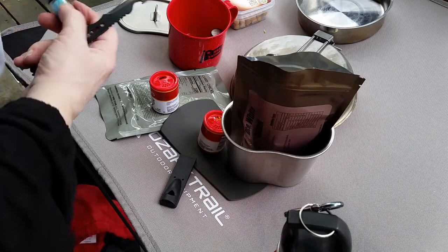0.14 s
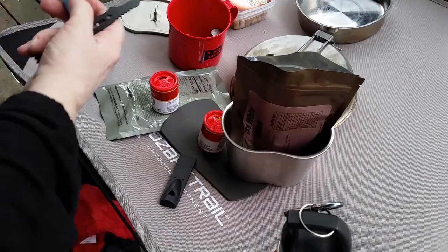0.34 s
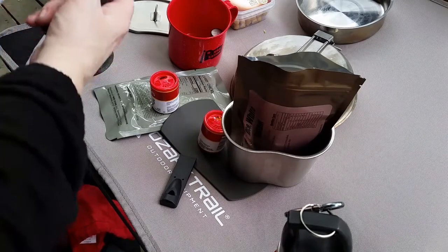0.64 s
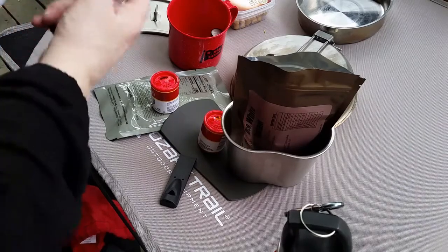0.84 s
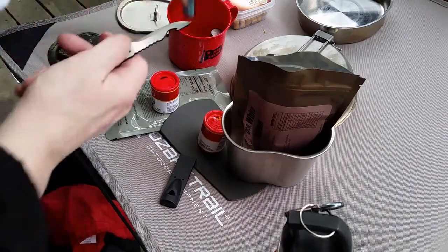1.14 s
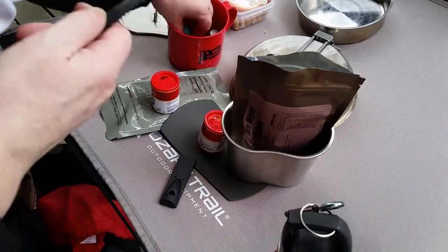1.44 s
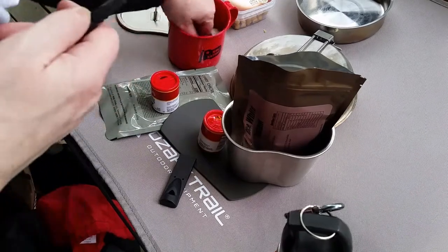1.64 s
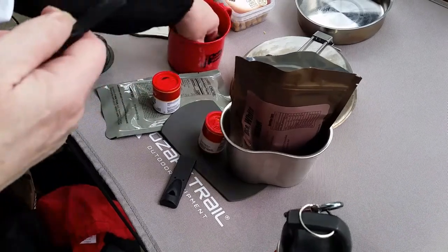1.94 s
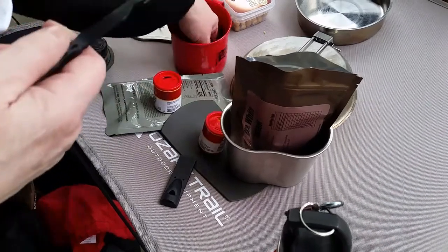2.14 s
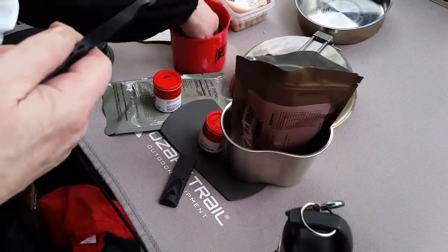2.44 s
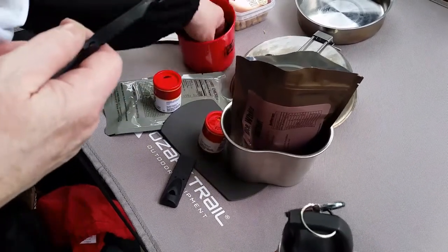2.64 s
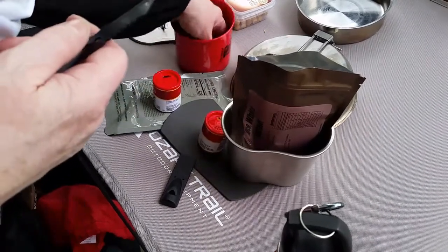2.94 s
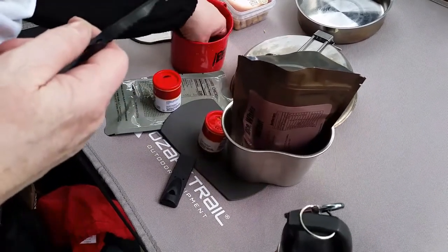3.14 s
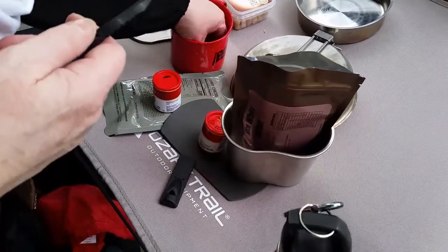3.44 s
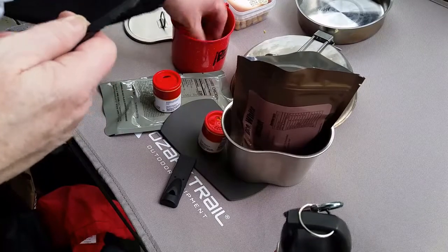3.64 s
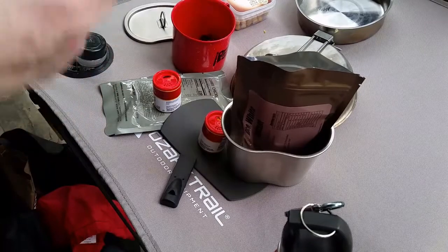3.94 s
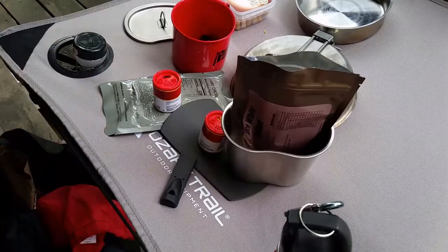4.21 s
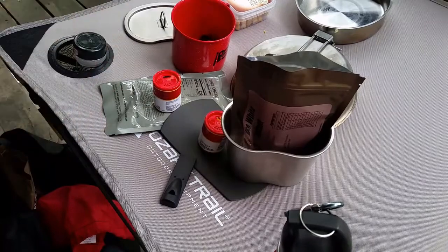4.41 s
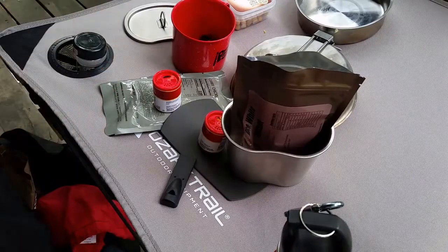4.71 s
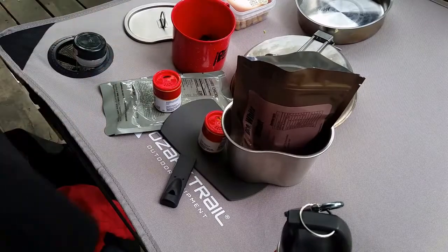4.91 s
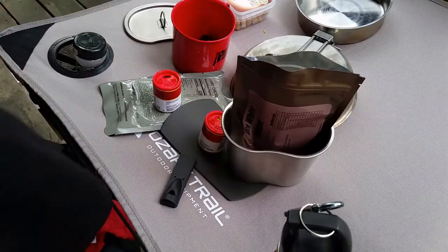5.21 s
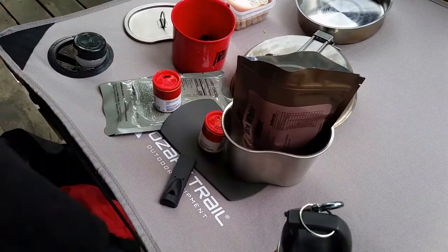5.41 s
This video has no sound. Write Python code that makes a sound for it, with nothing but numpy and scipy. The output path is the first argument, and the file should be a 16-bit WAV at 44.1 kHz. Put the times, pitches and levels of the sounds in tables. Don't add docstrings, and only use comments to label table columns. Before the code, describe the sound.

A metal spoon clinks, scrapes and knocks inside a hollow plastic mug, then the mug thuds down, over a steady low traffic rumble and hiss.

```python
import sys
import numpy as np
from scipy import signal
from scipy.fft import rfft, irfft, next_fast_len
from scipy.io import wavfile
from scipy.ndimage import uniform_filter1d

SR = 44100
rng = np.random.default_rng(int(sys.argv[2]) if len(sys.argv) > 2 else 0)


def wav_record(signal):
    frames = np.transpose(np.atleast_2d(signal))
    bounded = np.clip(frames, -1, 1)
    quanta = np.round(bounded * 32767).astype(np.int16)
    wavfile.write(sys.argv[1], SR, quanta)


def gain_from_db(level_db):
    decades = np.asarray(level_db, float) / 20
    return 10 ** decades


N = 245637

# (frequency [Hz], left minus right for far sound [dB],
# left minus right for near sound [dB], likeness of the ports [0..1])
PORT_SHADE = [(60.5, -2, -9, 1), (268, -3.5, -5, 0.82), (477, -7.5, -8, 1), (760, -11, -5.5, 0.069),
              (1250, -12, -18.5, 0.14), (2720, -13.5, -12.5, 0.29), (4280, -6, -12, 0.092),
              (5500, -10.5, -9, 0.073), (6060, -26, -7, 0.12), (8000, -117, -51, .15),
              (11300, -72, -13, .1), (11800, -13.5, -10, .1), (15800, -9, -9, .15)]


def evened(x):
    return x / np.sqrt(np.mean(x ** 2) + 1e-20)


def smooth_noise(size, width):
    once = uniform_filter1d(rng.standard_normal(size), width)
    return evened(uniform_filter1d(once, width))


def read(points, hz, column=1):
    table = np.transpose(points)
    return np.interp(np.log(hz + 1), np.log(table[0] + 1), table[column])


def bump(hz, centre_hz, width_hz):
    return np.exp(-.5 * ((hz - centre_hz) / width_hz) ** 2)


def add(mix, s, sound):
    part = mix[:, round(s * SR):][:, :sound.shape[1]]
    part += sound[:, :part.shape[1]]


def blow(t60, rise, size=9000, grip=0.83):
    t = np.arange(size) / SR
    attack = np.sin(np.pi / 2 * np.minimum(t / max(rise, 1e-4), 1)) ** 2
    decay = gain_from_db(-60 * (t / max(t60, .004)) ** grip)
    return t, attack * decay


def ring(modes, db, damping=0.9, scatter_db=5.5, rise=0.00052, detune=0.):
    fingers = 1.44
    out = 0
    for (hz, mode_db, t60), (luck, left, right) in zip(modes, rng.standard_normal((len(modes), 3))):
        t, shape = blow(t60 * damping, rise, grip=fingers)
        phase = np.array([[left], [right]])
        wave = np.sin(2 * np.pi * hz * (1 + detune * left) * t + phase)
        out = out + gain_from_db(db + mode_db + scatter_db * luck) * shape * wave
    return out


def whistle(s, db, hz, wobble):
    t = np.arange(N) / SR
    drift = smooth_noise(N, 1500)
    turns = np.cumsum(np.interp(t, s, hz) * (1 + wobble * drift)) / SR
    return turns, np.sqrt(2) * gain_from_db(np.interp(t, s, db, -150, -150))


def outdoors():
    # (time [s], traffic [dB], hiss [dB], thin insect band [dB], leaf rustle [dB])
    air = [(0, -33, -51.5, -58.5, -54), (1.5, -33.5, -52.5, -65, -52), (3.5, -33.5, -50.5, -66, -57),
           (3.75, -37, -55.5, -65, -57), (4.5, -35, -54.5, -68, -55), (5.2, -32.5, -53, -62.5, -50.5),
           (5.57, -33.5, -54, -65, -50.5)]
    # (frequency [Hz], level [dB per Hz])
    traffic = [(12, -51), (20, -33), (53, -10.5), (72, -3.5), (141, -8.5), (172, -8), (219, -8.5),
               (250, -13.5), (365, -18.5), (498, -20.5), (544, -19), (1030, -20), (1480, -27.5),
               (1920, -29), (4000, -45.5), (5200, -81), (8800, -120)]
    # (frequency [Hz], level [dB per Hz])
    hiss = [(1470, -33), (2500, 15), (3140, -1), (3940, -8.5), (4570, -7.5), (4950, -8.5), (5700, -14.5),
            (6460, -13.5), (7210, 3), (8110, 4), (8770, -2), (12000, 2), (13600, -2.5), (15100, 1),
            (16300, -15)]
    left_lag_s = 0.00039
    frames, hz = N // 512 + 6, np.fft.rfftfreq(2048, 1 / SR)
    a, b, c, d, patches = rng.standard_normal((frames, 1025, 5)).T
    patches = uniform_filter1d(patches, 14, 0)
    patches = evened(uniform_filter1d(patches, 8, 1))

    s, traffic_db, hiss_db, insect_db, leaf_db = np.transpose(air)
    t = np.arange(frames) * 512 / SR
    low = (hz < 3000)[:, None]
    power = gain_from_db(2 * (read(traffic, hz)[:, None] + np.interp(t, s, traffic_db) + 27.5)) * low
    power += gain_from_db(2 * (read(hiss, hz)[:, None] + np.interp(t, s, hiss_db) + 8.5)) * ~low
    power += gain_from_db(2 * (np.interp(t, s, insect_db) + 19.5)) * bump(hz, 4905, 79)[:, None]
    power += gain_from_db(2 * (np.interp(t, s, leaf_db) + 11.5)) * bump(hz, 8870, 910)[:, None]

    right, left_only = a + 1j * b, c + 1j * d
    same = np.clip(read(PORT_SHADE, hz, column=3), 0, 1)[:, None]
    shade = gain_from_db(read(PORT_SHADE, hz)) * np.exp(-2j * np.pi * hz * left_lag_s)
    left = shade[:, None] * (same * right + np.sqrt(1 - same ** 2) * left_only)
    spectra = np.array([left, right]) * np.sqrt(power) * gain_from_db(0.45 * patches - 26.5)
    return signal.istft(spectra, nperseg=2048, noverlap=1536)[1][:, :N]


def engines():
    # (time [s], level at the top of a beat [dB])
    drone = [(0, -29), (.6, -28), (.95, -34.5), (1.4, -31.5), (1.8, -38.5), (2.5, -33.5), (2.95, -35),
             (3.3, -44), (3.95, -38.5)]
    drone_hz, beat_hz, beat_top_s, beat_depth = 70.1, 2.53, 0.15, 1
    s, db = np.transpose(drone)
    turns, level = whistle(s, db - 0.5, np.full(len(s), drone_hz), wobble=0.037)
    t = np.arange(N) / SR
    second = beat_depth * np.exp(2j * np.pi * beat_hz * (t - beat_top_s))
    beat = abs(1 + second) / (1 + beat_depth)
    wave = np.sin(2 * np.pi * turns - np.array([[.3], [0]]))
    return beat * level * wave * gain_from_db(np.array([[-.8], [.8]]))


def rubbed_lid():
    # (time [s], level [dB], pitch [Hz])
    hollow = [
        (.5, -60, 250),
        (.54, -36, 253),
        (.62, -38, 249),
        (.67, -60, 246),
    ]
    turns, level = whistle(*np.transpose(hollow), wobble=0.0051)
    return level * np.sin(2 * np.pi * turns) * gain_from_db(np.array([[4], [-3]]))


def base_thuds():
    # (time [s], level [dB], pitch [Hz], t60 [s])
    thuds = [(3.898, -12.5, 462, 0.059), (3.898, -11, 790, 0.06), (3.998, -11, 895, 0.036),
             (3.997, -24, 450, 0.034), (4.006, -23, 820, 0.11)]
    out = np.zeros((2, N))
    for s, db, hz, t60 in thuds:
        t, shape = blow(t60, rise=0.0012)
        add(out, s, gain_from_db(db) * shape * np.sin(2 * np.pi * hz * t) * np.ones((2, 1)))
    return out


def fingernails():
    # (time [s], peak level [dB], pitch [Hz], t60 [s])
    taps = [(2.2915, -32, 1320, 0.04), (2.293, -33.5, 1514, 0.11), (2.4214, -24.5, 1505, 0.06),
            (2.5486, -28, 1484, 0.064), (2.5628, -30, 1500, 0.027), (2.7132, -37.5, 1410, 0.069),
            (3.9976, -21, 2250, 0.015)]
    out = np.zeros((2, N))
    for s, db, hz, t60 in taps:
        handle = [(hz, 0, .6 * t60), (.75 * hz, -8, .4 * t60), (1.4 * hz, -8, t60)]
        add(out, s, ring(handle, db + 2.0, scatter_db=-2, rise=0.00032))
    return out


def mug():
    # (time [s], peak level [dB], wall pitch as set by the grip [Hz], rim overtones [dB])
    knocks = [(1.657, -1, 634, -54), (1.665, -14, 636, -60), (1.66, -32, 725, -42), (1.673, -11, 688, -39),
              (1.94, -5.5, 634, -30), (1.961, -7, 622, -32), (1.968, -10.5, 633, -42),
              (1.977, -13, 647, -32.5), (2.041, -18.5, 670, -39), (2.107, -18.5, 646, -60),
              (2.895, -12.5, 680, -45), (3.038, -16.5, 716, -40), (3.067, -27, 700, -50),
              (3.078, -24, 660, -45), (3.086, -23, 690, -45), (3.366, -0.5, 633, -27),
              (3.377, -17, 614, -33.5), (3.387, -16, 686, -33.5), (3.408, -9, 685, -34),
              (3.422, -8.5, 654, -47), (3.435, -12.5, 645, -33), (3.448, -22, 675, -36),
              (3.487, -22, 650, -35.5), (3.514, -17, 613, -59), (3.588, -18, 680, -34.5),
              (3.8995, -7, 612, -42), (3.909, -17, 609, -44), (3.92, -13, 602, -39), (3.932, -21, 622, -44),
              (3.997, -14.5, 590, -54), (4.007, -21, 617, -41), (4.078, -28, 640, -60),
              (4.087, -29, 650, -60)]
    # (time [s], peak level [dB], wall pitch [Hz])
    rocks = [(1.688, -31, 713), (1.95, -17, 643), (2.064, -30, 690), (2.086, -31.5, 700),
             (2.124, -29.5, 670), (2.369, -34, 634), (2.392, -33, 665), (2.55, -33, 677), (2.635, -36, 675),
             (2.72, -34.5, 664), (2.958, -23.5, 704), (3.013, -32, 704), (3.226, -29, 697),
             (3.252, -28.5, 575), (3.261, -31, 640), (3.323, -27, 630), (4.019, -27, 598),
             (4.043, -24, 610)]
    # (frequency [Hz], level [dB], t60 [s])
    rim = [(1220, -0.5, 0.069), (1994, -2.5, 0.031), (2314, -5, 0.1), (2410, 0.5, 0.075),
           (3525, -5.5, 0.048), (4870, -14.5, .06)]
    wall_t60_s, wall_rise_s = 0.031, 0.006
    rock_t60_s, rock_rise_s, rock_rim_db = 0.052, 0.0019, -14.5
    let_go_s, free_ring = 3.8, 1.54
    hand = 1.94
    out = np.zeros((2, N))
    hard = [(*row, wall_t60_s, wall_rise_s) for row in knocks]
    light = [(s, db, hz, db + rock_rim_db, rock_t60_s, rock_rise_s) for s, db, hz in rocks]
    for s, db, hz, rim_db, t60, rise in hard + light:
        freedom = free_ring if s > let_go_s else 1
        t, shape = blow(0.73 * t60 * freedom, rise, grip=hand)
        wall = np.sin(2 * np.pi * hz * t - np.array([[.3], [0]]))
        add(out, s - .002, gain_from_db(db + 2.5) * shape * wall)
        add(out, s - .002, ring(rim, rim_db + 2.0, scatter_db=-2.5, rise=.002, detune=.012))
    return out


def chatter():
    # (time [s], peak level [dB], middle relative [dB], bounce relative [dB])
    hits = [(0.5033, -25, -4, -6), (1.6023, -14.5, -4, -6.5), (1.6544, -11, -4, -3.5), (1.884, -16, 2, -15),
            (2.0445, -11, -3, -18), (2.369, -17, 4, -20), (2.534, -17.5, -12, -20), (2.8933, -13.5, 1, -22),
            (2.9562, -5, -5, -14), (2.9614, -4.5, 1, -12), (3.0137, -16, -3, -9), (3.028, -11, -3, 1.5),
            (3.2266, -26.5, 7, -22), (3.305, -21, -16, 1), (3.364, -12.5, 5, -8), (3.4352, -18, 1, -19),
            (3.485, -19.5, 2, -19), (3.5855, -8, -8, -5), (3.898, -21.5, 0, -3), (3.9972, -12.5, 3.5, -6.5)]
    # (time [s], peak level [dB], middle relative [dB])
    scrapes = [(0.523, -27, 0), (1.6744, -21.5, 10), (1.9375, -22, 6), (1.959, -21.5, 7),
               (2.0667, -23.5, 7), (1.99, -33, 10), (2.0847, -27, 0), (2.1, -29, 4), (2.1303, -21.5, 1),
               (2.1444, -31, 10), (2.2169, -31, 4.5), (2.2927, -30, 3), (2.3895, -30, 6), (2.42, -30, 4),
               (2.5494, -29, 6.5), (2.975, -16, 12), (2.9914, -27, 6), (3.058, -26.5, 11),
               (3.077, -23.5, 8), (3.251, -23, 0), (3.2577, -30, 12), (3.2677, -26, 6), (3.2844, -38, -10),
               (3.3174, -28, -4), (3.9097, -29, 10), (3.9197, -26.5, 8), (3.945, -30, 10),
               (3.9924, -27, -9), (4.0214, -26.5, 9), (4.0428, -30, 6)]
    # (frequency [Hz], width [Hz], level [dB])
    glints = [(7470, 20, 12), (7800, 90, 1.5), (8660, 60, 8), (9755, 50, 6), (9927, 40, 12), (10360, 70, 9),
              (10990, 60, 6), (11600, 76, 6), (12630, 80, 6), (13090, 90, 6), (14740, 60, 7),
              (14400, 90, -1)]
    strike_t60_s, strike_lower_db = 0.078, -7.5
    bounce_s, bounce_middle_db = 0.011, -3
    scrape_t60_s, scrape_lower_db = 0.13, -7.5
    in_mug_s = 1.5
    out, hz = np.zeros((2, N)), np.fft.rfftfreq(8192, 1 / SR)
    contacts = []
    for s, db, middle_db, less_db in hits:
        contacts.append((s, db, strike_t60_s, strike_lower_db, middle_db))
        contacts.append((s + bounce_s, db + less_db, strike_t60_s, strike_lower_db, bounce_middle_db))
    for s, db, middle_db in scrapes:
        contacts.append((s, db, scrape_t60_s, scrape_lower_db, middle_db))

    depth_db = read([(5000, 5), (8000, 4.5)], hz)
    for s, db, t60, lower_db, middle_db in contacts:
        shared, own = rng.standard_normal((2, 8192))
        lumps = smooth_noise(len(hz), 9)
        struck = rng.uniform(0.23, 1.27, len(glints)) * (s > in_mug_s)
        glints_db = sum(k * peak_db * bump(hz, f, width) for k, (f, width, peak_db) in zip(struck, glints))
        colour = [(500, middle_db - 11), (1300, middle_db - 6.5), (2500, middle_db - 7.5),
                  (5500, middle_db - 13.0), (6250, middle_db - 14),
                  (7300, lower_db + 10.0), (9800, lower_db + 4.5), (11500, 1), (15200, 0.5), (17000, -6)]
        noise = np.array([0.16 * shared + 1.2 * own, shared])
        burst = irfft(rfft(noise) * gain_from_db(read(colour, hz) + depth_db * lumps + glints_db))
        shape = blow(t60, rise=0.0007, size=8192)[1]
        add(out, s, gain_from_db(db - 7) * burst * shape)
    return out


def spoon():
    # (time [s], stem [dB], bowl [dB], neck [dB], tip [dB])
    clinks = [(1.6063, -46, -48, -50, -52), (1.8856, -25, -42, -46, -38), (1.939, -36, -47, -55, -60),
              (2.046, -32.5, -39, -48, -42), (2.14, -41, -46, -44, -46), (2.3698, -40, -36, -27, -39),
              (2.5335, -46, -49, -54, -55), (2.894, -40, -56, -58, -47), (2.9575, -20, -34, -49, -33),
              (2.972, -26, -60, -46, -45), (2.986, -27, -60, -60, -60), (3.0152, -40, -47, -55, -40),
              (3.041, -34, -45, -49, -39), (3.078, -44, -43, -50, -52), (3.252, -40, -48, -60, -45),
              (3.305, -40, -42, -58, -61), (3.3136, -45, -50, -52, -50), (3.396, -29.5, -56, -54, -52),
              (3.5876, -20, -40, -45, -40), (3.998, -41, -56, -63, -46)]
    # (frequency [Hz], level [dB], t60 [s])
    families = [
        [(1655, -2, .135), (1690, -16, .1), (1912, -14, .07)],
        [(2420, -6, .2), (2620, -9, .2), (2807, -5, .2), (2930, -8, .18), (3027, -6, .22), (3075, -3, .18),
         (3215, -7, .22)],
        [(3690, -10, .15), (3766, -3, .15)],
        [(4370, -1, .11), (4810, -7, .13), (5020, -8, .13), (5507, -5, .12)],
    ]
    # (time [s], level [dB], frequency [Hz], t60 [s])
    pings = [(1.884, -42, 4360, 0.14), (1.99, -43, 3750, 0.15), (2.046, -33, 5500, 0.047),
             (3.587, -29, 9927, .12), (3.587, -29, 7413, .08), (2.7, -43, 2600, .05),
             (2.894, -34, 2700, 0.026), (2.962, -25, 2290, 0.1), (2.957, -27, 3585, 0.11),
             (2.974, -29, 3640, 0.05), (2.958, -23, 1940, 0.07), (2.958, -32, 3080, .1),
             (2.958, -34, 5500, .08), (2.975, -35, 5500, .05), (3.016, -21, 1680, .035),
             (3.024, -27, 2056, .09), (3.04, -36, 1270, .15), (3.066, -32, 1600, .03),
             (3.095, -34, 1750, .04), (3.255, -36, 3250, .03), (3.264, -30, 1690, .17),
             (3.316, -24, 1717, .055), (3.305, -36, 2810, .2), (3.305, -38, 3031, .2),
             (3.305, -41, 3214, .2), (3.366, -27, 1233, .08), (3.392, -29, 1233, .14),
             (3.365, -31, 3488, .07), (3.446, -27, 2400, .032), (3.485, -32, 2390, .07),
             (3.485, -37, 3500, .06), (3.588, -38, 2810, .25), (3.596, -41, 4371, .1),
             (3.93, -24, 608, .18), (3.916, -33, 2309, .16), (3.918, -34, 3450, .04),
             (3.92, -35, 1254, .14), (4.022, -34, 2450, .04), (4.003, -42, 3550, .14),
             (1.962, -32, 3520, .06), (2.957, -32, 1260, 0.18), (3.03, -29.5, 1800, 0.11),
             (3.035, -35, 3720, .12), (2.898, -33, 3720, 0.07), (1.668, -32, 3540, 0.066),
             (1.604, -41, 2150, 0.11), (3.587, -36, 5480, .06), (3.588, -43, 3070, 0.42),
             (3.588, -44, 2420, 0.5), (3.225, -36, 2150, 0.045), (4., -35, 5100, 0.039),
             (3.998, -36, 4220, 0.13), (4.043, -43, 4200, .05)]
    pinched, loose = .75, 1.4
    loose_s = 3.5
    out = np.zeros((2, N))
    for s, *levels_db in clinks:
        dampings = [pinched, loose if s > loose_s else pinched, pinched, pinched]
        for modes, db, damping in zip(families, levels_db, dampings):
            add(out, s, ring(modes, db + 0.5, damping, scatter_db=-2.0))
    for s, db, hz, t60 in pings:
        add(out, s, ring([(hz, db, t60)], 0, scatter_db=0))
    return out


def clutter(x):
    shape = blow(0.14, rise=0.0039, size=6000)[1]
    signs = rng.choice([-1., 1.], (2, 6000))
    echoes = signs * (rng.random((2, 6000)) < .08) * shape
    echoes /= np.linalg.norm(echoes, axis=1, keepdims=True)
    return gain_from_db(-8.5) * signal.oaconvolve(x, echoes, axes=1)[:, :N]


def housing(near):
    size = next_fast_len(N)
    shade = gain_from_db(read(PORT_SHADE, np.fft.rfftfreq(size, 1 / SR), column=2))
    left = irfft(rfft(near[0], size) * shade, size)[:N]
    return np.array([left, near[1]])


def scene():
    far = outdoors() + engines() + rubbed_lid()
    knocks = base_thuds() + fingernails() + mug()
    grit, rings = chatter(), spoon()
    scattered = clutter(rings + grit)
    flutter_db = 1.5 * smooth_noise(N, 200) - .5
    near = knocks + rings * gain_from_db(flutter_db) + grit + scattered
    return housing(near) + far


def low_pass(x):
    return signal.sosfilt(signal.butter(12, 16980, fs=SR, output="sos"), x)


def record(dry):
    edge_hz = 15750
    lowpass = signal.firwin(255, edge_hz, window=("kaiser", 8), fs=SR)
    limited = signal.oaconvolve(dry, lowpass[None], "same")
    return low_pass(limited)


dry = scene()
out = record(dry)
wav_record(out)
```